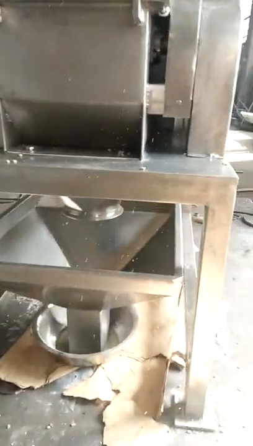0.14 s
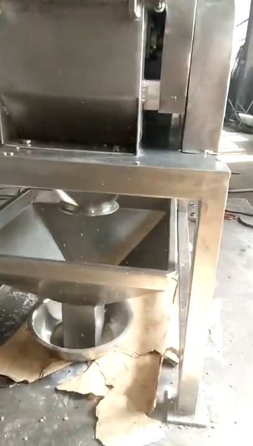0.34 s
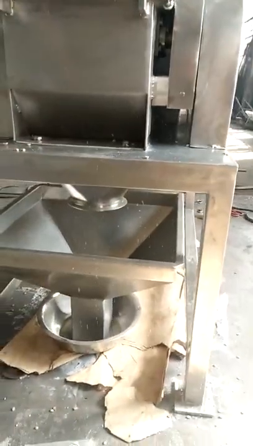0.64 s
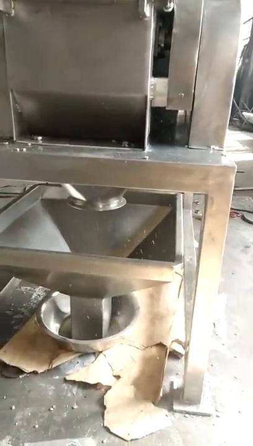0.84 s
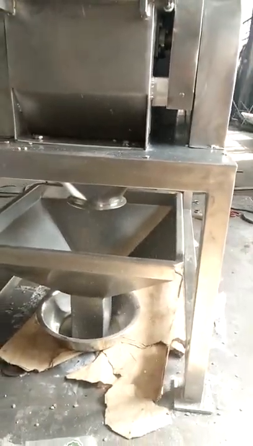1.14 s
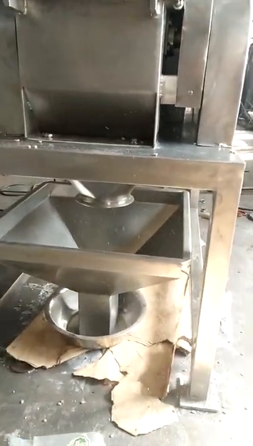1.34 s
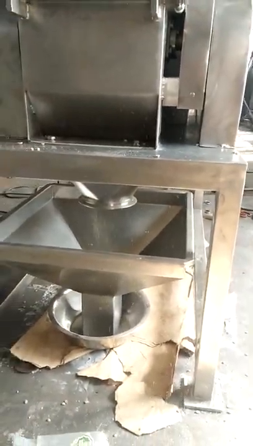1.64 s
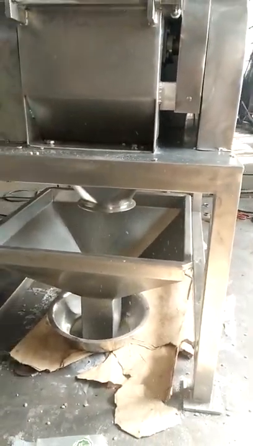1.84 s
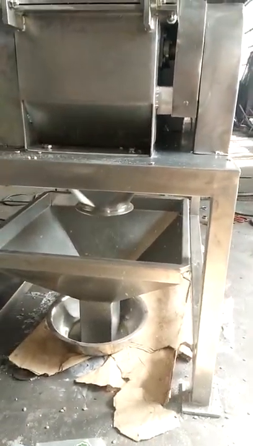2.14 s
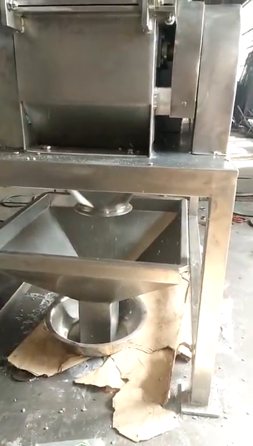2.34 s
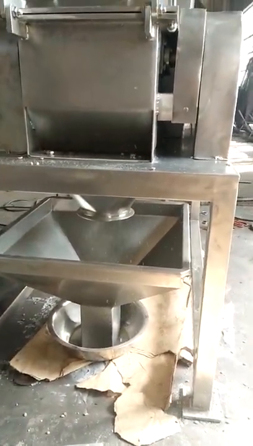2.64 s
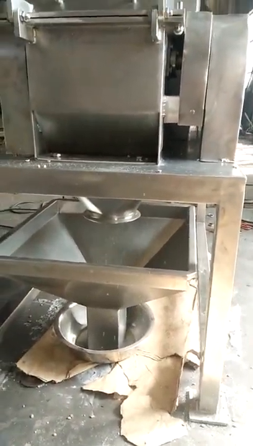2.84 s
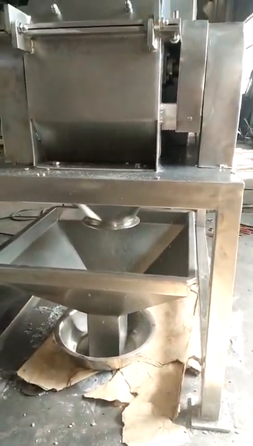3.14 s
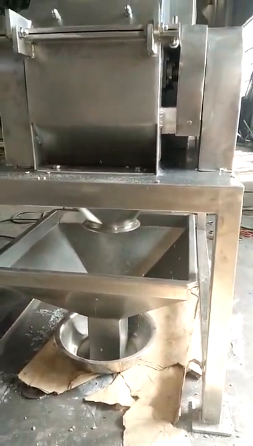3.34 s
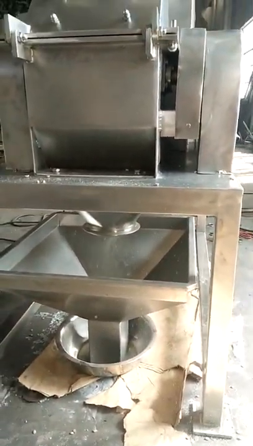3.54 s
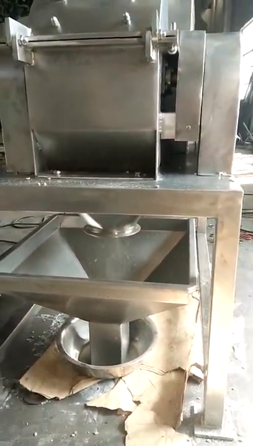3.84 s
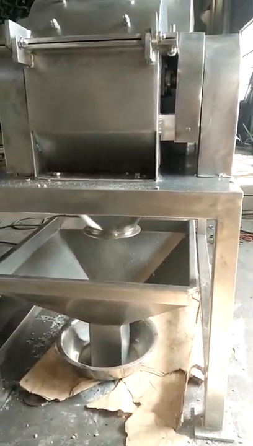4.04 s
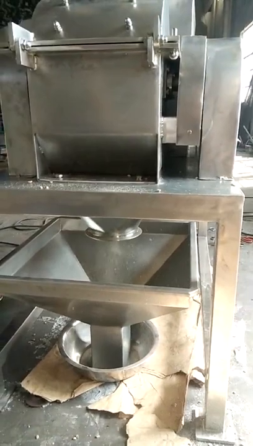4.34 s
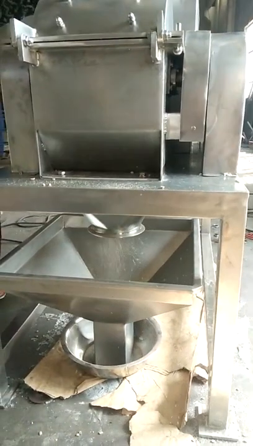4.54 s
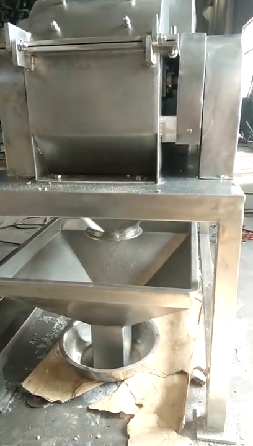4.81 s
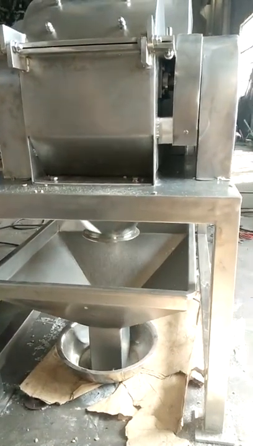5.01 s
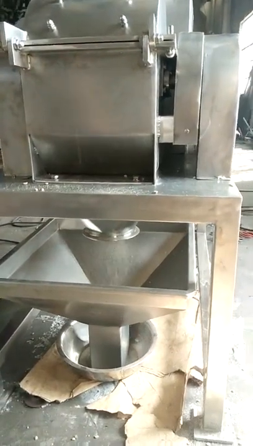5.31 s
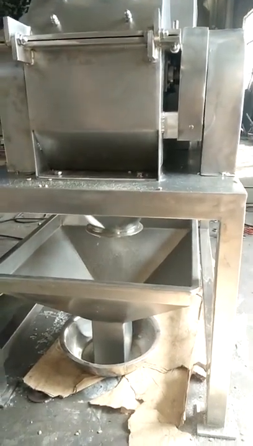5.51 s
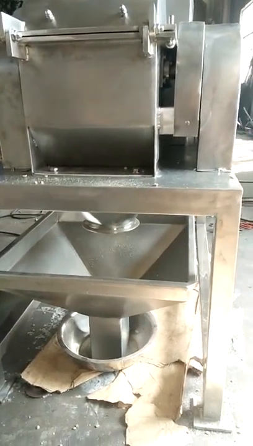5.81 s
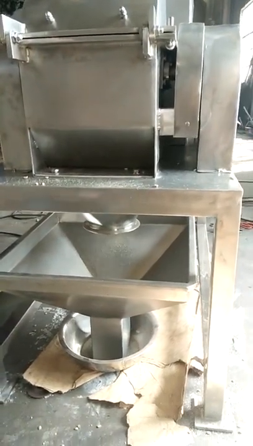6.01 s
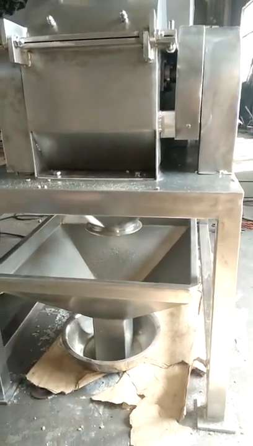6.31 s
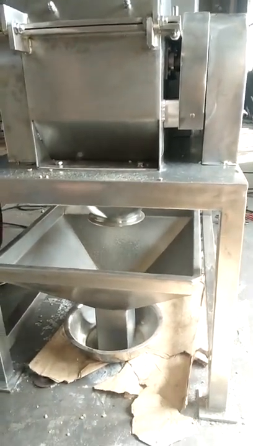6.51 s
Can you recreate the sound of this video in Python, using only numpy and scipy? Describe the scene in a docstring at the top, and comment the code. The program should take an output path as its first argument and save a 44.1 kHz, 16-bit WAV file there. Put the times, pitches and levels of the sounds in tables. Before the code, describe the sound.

A steel hammer mill runs steadily indoors, its droning rotor under a strong bright hiss, with coffee beans cracking in quick metallic sprays.

```python
"""A steel hammer mill grinds coffee beans in a workshop, heard from a slowly drifting hand-held microphone.
From the start the rotor drones on the multiples of its turning speed and blows a roar of air, over a faint hum.
Fragments hiss against the screen, and single beans crack in noisy sprays that ring the steel.
As the chamber fills, quickly at first, the rotor slows a little and the hiss rises;
meanwhile the strong tones fade, the high ones faster, and some dip in the room's quiet spots."""
import sys
import numpy as np
from scipy import signal
from scipy.fft import rfft, irfft
from scipy.io import wavfile

SR = 44100
rng = np.random.default_rng(int(sys.argv[2]) if len(sys.argv) > 2 else 0)


def log_audio(samples):
    """Write samples as a 16-bit WAV file to the path given in sys.argv[1]."""
    # one column per channel
    frames = np.atleast_2d(samples).T
    # limit to full scale, then quantise
    limited = np.clip(frames, -1, 1)
    pcm = np.round(limited * 32767).astype(np.int16)
    wavfile.write(sys.argv[1], SR, pcm)


N = 293706
TIME, FREQ = np.arange(N) / SR, np.fft.rfftfreq(N, 1 / SR)


def rotor(jitter_hz=0.0111, drift=0.1, drift_hz=0.69, weak_drift=0.46, flutter=0.03, flutter_hz=9, count=110):
    """The hammers chop the air: a stack of tones locked to one shaft angle."""
    # strong tones, before fade and quiet spots: (multiple of the speed, level [dB rms])
    strong_tones = [(4, -38), (7, -24.5), (8, -30), (9, -38.5), (14, -28.5), (15, -33), (16, -30.5),
                    (18, -32.5), (19, -35.5), (20, -30.5), (21, -41), (25, -29.5), (26, -32.5), (28, -42.5),
                    (36, -38), (43, -38), (67, -33.5), (71, -38), (88, -43), (95, -37.5)]
    # weaker multiples in between: (frequency [Hz], level of each tone [dB rms])
    weak_tones = [(43, -80), (130, -82), (210, -49), (450, -55), (1250, -50.5), (1800, -52.5), (2400, -46),
                  (4000, -44), (5200, -46.5)]
    # quiet spots in the room's standing waves: (multiple of the speed, time [s], depth [dB])
    quiet_spots = [(4, -1, -8), (16, 2, -4.5), (14, 3, -18.5), (19, 2.5, -7), (15, 3.5, -1.5), (8, 5, -10),
                   (7, 5, -2.5), (25, 4.5, -0.5), (20, 7, -10)]
    free_turns_per_s, sag_turns_per_s = 43.26, 0.19
    # strong tones fade as the microphone drifts: rate at 1 kHz, and the power of frequency it follows
    fade_db_per_s, fade_slope = 0.55, 0.46
    spot_s = 1.17  # time to drift out of a quiet spot of a 1 kHz tone; longer waves have wider spots

    # the load of beans slows the rotor
    speed = free_turns_per_s - sag_turns_per_s * fill()
    turns = np.cumsum(speed + jitter_hz * wander(2.93)) / SR
    strong = {round(k): db for k, db in strong_tones}
    spots = {round(k): (s, db) for k, s, db in quiet_spots}
    phase = whirl_phases()
    drone = np.zeros(N)
    for k in range(1, count):
        hz = k * free_turns_per_s
        khz = hz / 1000
        if k in strong:
            fade_db = fade_db_per_s * khz ** fade_slope * (TIME - TIME.mean())
            level_db, sway = strong[k] - fade_db, drift
        else:
            level_db, sway = over_pitch(weak_tones, hz), weak_drift
        if k in spots:
            at_s, depth_db = spots[k]
            level_db = level_db + depth_db * np.exp(-((TIME - at_s) * khz / spot_s) ** 2)
        # shorter waves vary more as the microphone sways, and flutter more in the churning air
        shortness = np.sqrt(min(khz, 2))
        along = shortness * (sway * wander(drift_hz) + flutter * wander(flutter_hz))
        across = shortness * (sway * wander(drift_hz) + flutter * wander(flutter_hz))
        angle = (2 * np.pi * (k * turns % 1) + phase[k]).astype(np.float32)
        drone += from_db(level_db) * ((1 + along) * np.cos(angle) + across * np.sin(angle))
    return np.sqrt(2) * drone  # rms to peak


def whirl_phases(size=256):
    """Tones riding on the hammers swoop once a turn (Doppler), which sets the phase of each multiple."""
    # whirling tones: (multiple of the speed, depth of the swoop in angle [rad])
    swoops = [(8, .4), (20, .5)]
    angle = 2 * np.pi * np.arange(size) / size
    turn = sum(np.cos(k * (angle + depth * np.sin(angle))) for k, depth in swoops)
    # multiples beyond the reach of the swoops fall in no fixed order
    scatter = rng.standard_normal(size // 2 + 1) + 1j * rng.standard_normal(size // 2 + 1)
    return np.angle(rfft(turn) + scatter)


def fill():
    """How full the grinding chamber is (0-1): it fills quickly at first, then ever more slowly."""
    fill_s = 4
    return 1 - np.exp(-TIME / fill_s)


def beans(per_s=120, spread_db=0.5, small_db=-1.0, loud_db=1.5, shatter_t60=0.11, rise_s=0.0078,
          snap=0.83, snap_t60=0.015, grit_db=0.5, pivot_hz=9000):
    """Each bean snaps on a hammer; its splinters spray some zones of steel harder than others and die away."""
    # single beans that are placed in time, before the common loud_db:
    # (time [s], level at pivot_hz [dB], brightness [dB per octave])
    single_beans = [(0.149, 7, 2), (0.294, 8, -4), (0.652, 9, -8), (0.699, 5, 5), (1.070, 13, 0),
                    (1.170, 8, 7), (1.211, 11, 3), (1.609, 4, 2), (2.187, 11, 1), (2.389, 8, -1),
                    (3.811, 9, 1), (4.381, 2.5, -7), (5.075, -6, 12), (5.894, 5, 5)]
    # zones of steel that splinters strike, before the housing's lift:
    # (frequency [Hz], width [Hz], level [dB per Hz], scale of unevenness from bean to bean [dB])
    zones = [(5510, 970, -62, 8), (6400, 970, -70, 11), (7670, 860, -77, 21), (8940, 70, -76, 18),
             (9600, 2600, -88.5, 14), (10830, 180, -78.5, 20), (11550, 1300, -84.5, 5),
             (13020, 170, -83, 18), (13500, 1800, -87.5, 9)]

    # power of one bean: a splinter spray that swells and dies, and a short snap
    t = TIME[:SR // 2]
    shatter = (1 - np.exp(-t / rise_s)) * from_db(-60 * t / shatter_t60) ** 2
    burst = shatter + snap * from_db(-60 * t / snap_t60) ** 2
    burst_spectrum = rfft(burst, N)
    at = np.flatnonzero(rng.random(N) < per_s / SR)
    size_db = spread_db * np.minimum(rng.exponential(1, N)[at], 3)
    spectrum = 0
    for hz, width, db, uneven_db in zones:
        blows = np.zeros(N)
        blows[at] = from_db(size_db + uneven_db * rng.uniform(-0.92, 1, N)[at]) ** 2
        # the mill is already running: circular convolution lets earlier sprays overlap the first moment
        power = irfft(rfft(blows) * burst_spectrum, N)
        power *= from_db(small_db) ** 2 / power.mean()
        for s, bean_db, bright_db in single_beans:
            part = power[round(s * SR):][:len(burst)]  # a view: adding to it adds to power
            zone_db = bean_db + loud_db + bright_db * np.log2(hz / pivot_hz)
            part += from_db(zone_db) ** 2 * burst[:len(part)]
        # splinters land one by one, so the spray is gritty
        grit_steps = rng.standard_normal(N // 32 + 1)
        grit = from_db(grit_db * np.repeat(grit_steps, 32)[:N])
        spray = white() * grit * np.sqrt(abs(power) / np.mean(grit ** 2))
        resonance = from_db(db) / (1 + ((FREQ - hz) / width) ** 2) ** 2
        spectrum = spectrum + rfft(spray) * resonance
    return radiate(irfft(spectrum, N), 0)


def rush(split_hz=2100, hiss_db=0.17, fine_hz=6000, fine_db=-3.5):
    """Steady air roar below; above it, countless fragments scour the screen harder as the chamber fills."""
    # air and ground coffee, before the housing's lift and the hiss settings:
    # (frequency [Hz], level [dB per Hz])
    rush_levels = [(30, -96), (60, -80), (100, -74.5), (200, -68.5), (300, -60), (500, -62), (1000, -64.5),
                   (2000, -58.5), (2900, -51.5), (4200, -53.5), (5700, -61), (7000, -71), (8700, -79),
                   (14000, -85)]
    empty_hiss_db, full_hiss_db = -1.6, 0.37
    level_db = over_pitch(rush_levels, FREQ)
    high = 1 / (1 + (split_hz / (FREQ + 1)) ** 8)  # share of power that is hiss
    fine = 1 / (1 + (fine_hz / (FREQ + 1)) ** 8)
    air = radiate(white(), level_db + 10 * np.log10(1 - high + 1e-9))
    scour = white()
    scour_db = level_db + hiss_db + fine_db * fine + 10 * np.log10(high + 1e-9)
    # the steel panels beam the hiss, so its colour turns as the microphone drifts
    turn_db = panel_turn_db()
    first = radiate(scour, scour_db - turn_db / 2)
    last = radiate(scour, scour_db + turn_db / 2)
    hiss = first + (last - first) * TIME / TIME[-1]
    return air + hiss * from_db(empty_hiss_db + (full_hiss_db - empty_hiss_db) * fill())


def panel_turn_db():
    """How the ripple that panel echoes put on the hiss shifts from the start of the drift to its end."""
    # echoes from nearby steel panels: (delay [s], change of delay over the drift [s], ripple [dB])
    panels = [(.00065, -.00005, 1.5), (.00119, .00005, 1.0)]
    turn_db = 0
    for delay, change, db in panels:
        first = np.cos(2 * np.pi * FREQ * delay)
        last = np.cos(2 * np.pi * FREQ * (delay + change))
        turn_db = turn_db + db * (last - first)
    return turn_db


def motor(waver=0.22):
    """A faint low hum under the rotor: steady sines that waver in level."""
    # (frequency [Hz], level before the waver [dB rms])
    hum_tones = [(100, -58), (153, -58)]
    hum = np.zeros(N)
    for hz, db in hum_tones:
        hum += np.sqrt(2) * from_db(db) * (1 + waver * wander(3.1)) * np.sin(2 * np.pi * hz * TIME)
    return hum


def radiate(drive, level_db):
    """Colours a pair of noises as mid and side and returns left and right; only the treble is wide."""
    # stereo width, none in the low and middle range: (frequency [Hz], side against mid [dB])
    width_levels = [(4000, -95), (4200, -30), (5600, -20), (7000, -11), (9000, -6.5), (14000, -6)]
    mid, side = rfft(drive) * from_db(level_db + housing_db())
    side = side * from_db(over_pitch(width_levels, FREQ))
    return irfft(np.array([mid + side, mid - side]), N)


def housing_db():
    """The lift that the resonances of the steel box give to the noise made inside it."""
    # resonances of the housing and the chute: (frequency [Hz], width [Hz], lift [dB])
    resonances = [(328, 69, 4), (591, 50, 4), (783, 142, 10.5), (1120, 310, 7), (1445, 73, 6.5),
                  (1592, 14, 6.5), (1775, 22, 9), (2390, 200, 4.5), (2740, 34, 4.5), (2828, 52, 4.5),
                  (2990, 37, 4), (3206, 37, 5), (3816, 73, 5.5), (4410, 66, 4), (4885, 93, 5.5),
                  (5360, 48, 9.5), (5680, 33, 5.5), (5810, 200, 3), (7400, 190, 4)]
    return sum(db / (1 + (2 * (FREQ - hz) / width) ** 2) for hz, width, db in resonances)


def white():
    """Two unrelated noises of unit power per Hz."""
    return rng.standard_normal((2, N)) * np.sqrt(SR / 2)


def wander(rate_hz, size=2048):
    """A smooth random curve of rms 1 that moves no faster than about the given rate."""
    span_s = 2 * TIME[-1]  # twice the scene, so the curve does not have to return to its start
    slow = np.fft.rfftfreq(size, span_s / size)
    curve = irfft(rfft(rng.standard_normal(size)) * np.exp(-(slow / rate_hz) ** 2) * (slow > 0))
    return np.interp(TIME, np.linspace(0, span_s, size), curve / curve.std())


def over_pitch(rows, hz):
    """A spectrum joined by straight lines on a log-frequency axis."""
    f, value = np.transpose(rows)
    return np.interp(np.log(hz + 1), np.log(f), value)


def from_db(db):
    """Decibels to gain."""
    return 10 ** (np.asarray(db) / 20)


def scene():
    """The drone and hum sit in the middle; the treble of the noises spreads around them."""
    return rotor() + beans() + rush() + motor()


def record(dry, window_s=0.023, threshold_db=-16.5, squeeze=0.65, makeup_db=1, edge_hz=14280):
    """A quick compressor evens out the din, so hiss and drone duck each other slightly; then a treble cut."""
    window = signal.windows.hann(round(window_s * SR))
    power = signal.oaconvolve((dry ** 2).mean(0), window, "same")
    smooth = power / signal.oaconvolve(np.ones(N), window, "same")
    over_db = np.maximum(10 * np.log10(abs(smooth) + 1e-12) - threshold_db, 0)
    even = dry * from_db(makeup_db - squeeze * over_db)
    low_pass = signal.firwin(1023, edge_hz, window=("kaiser", 9), fs=SR)
    return signal.oaconvolve(even, low_pass[None], "same")


dry = scene()
out = record(dry)
log_audio(out)
```